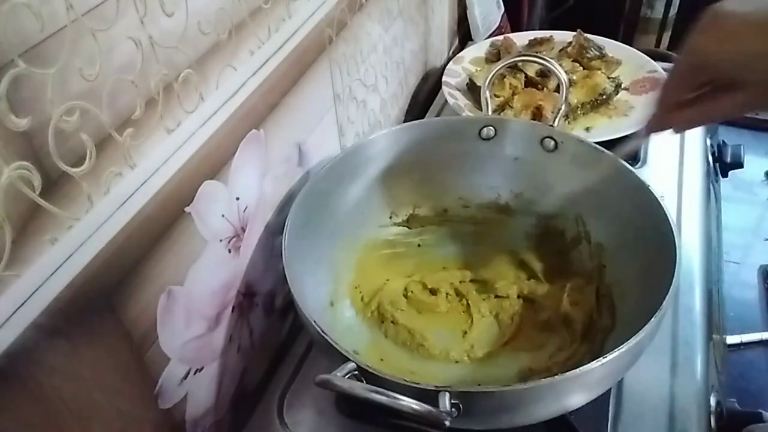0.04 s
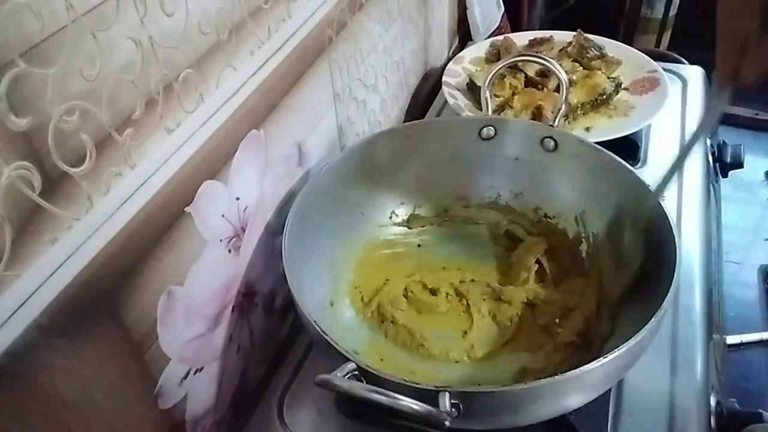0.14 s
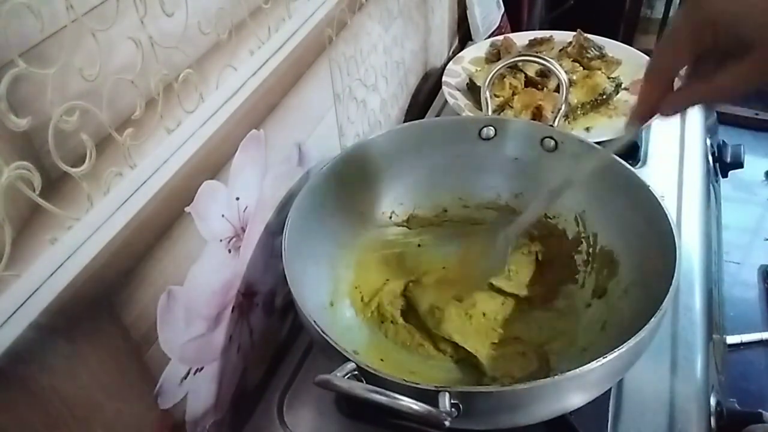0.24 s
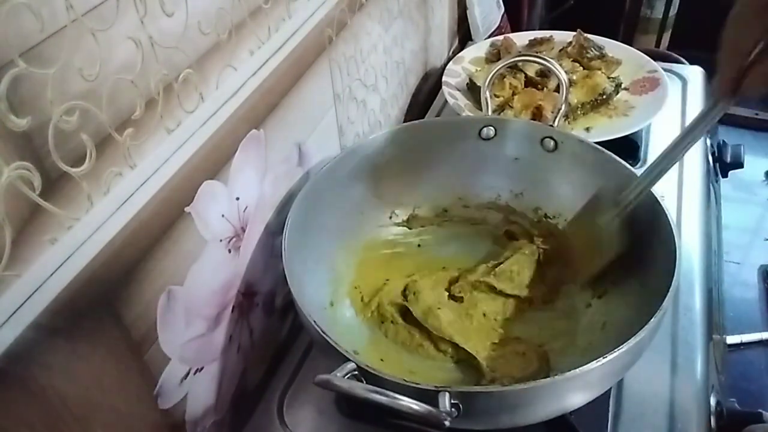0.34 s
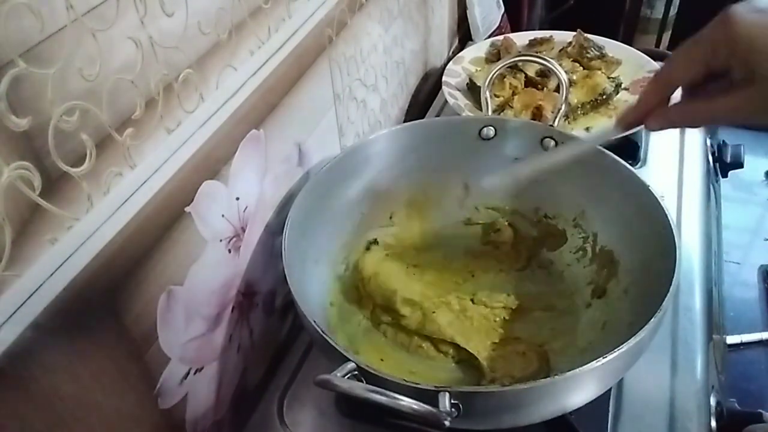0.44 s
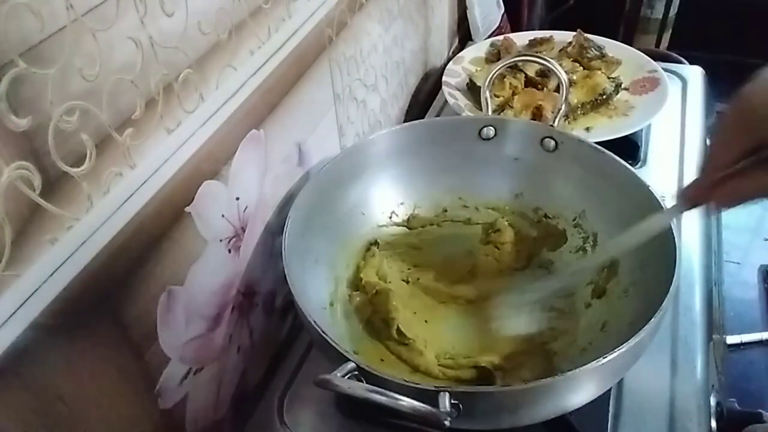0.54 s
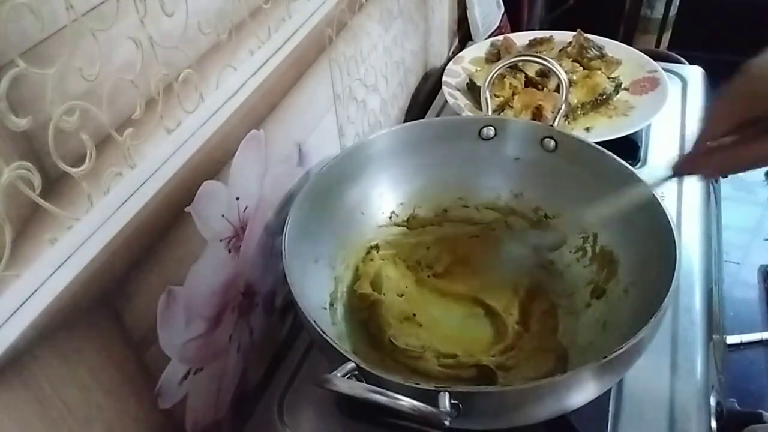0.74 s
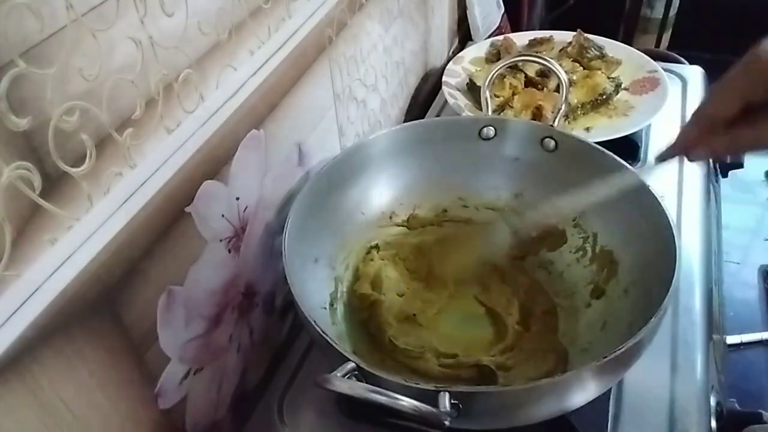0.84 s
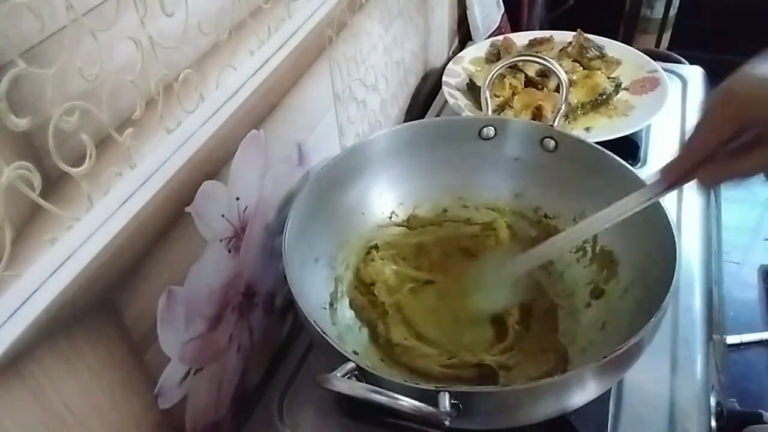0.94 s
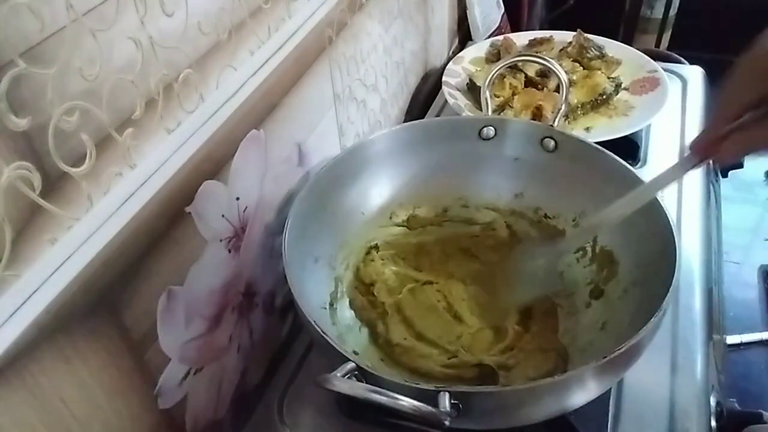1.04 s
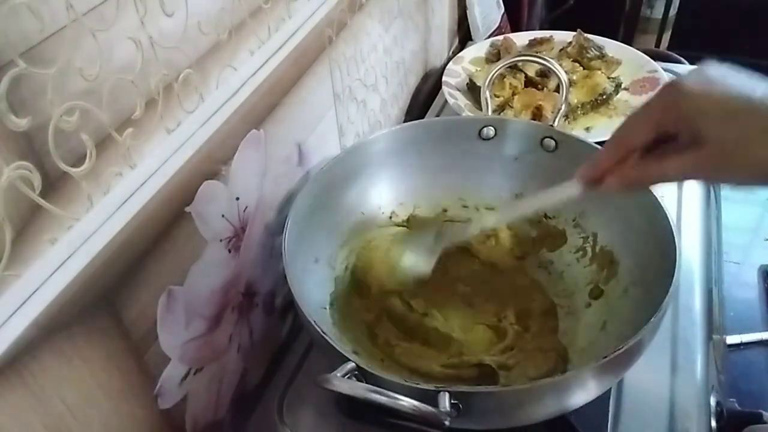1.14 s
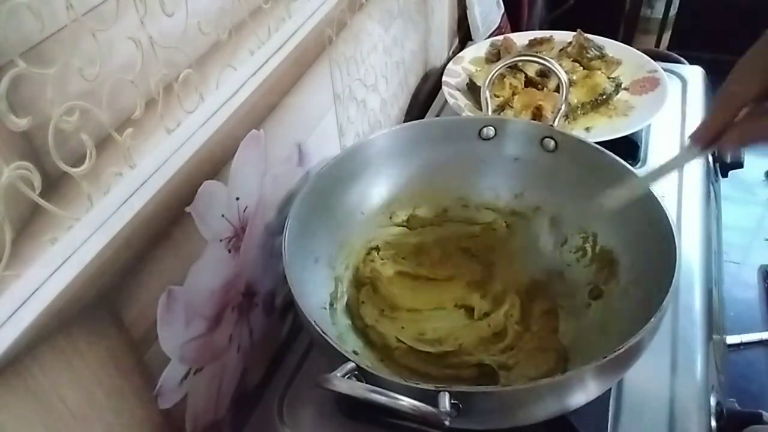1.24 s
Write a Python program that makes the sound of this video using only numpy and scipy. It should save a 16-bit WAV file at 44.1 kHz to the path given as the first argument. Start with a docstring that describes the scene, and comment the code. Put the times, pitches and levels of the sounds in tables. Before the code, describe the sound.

A spatula stirs thick paste in a metal pan, close by in a small kitchen. Light scrapes lead to a loud, juddering clank at 0.2 seconds that dies quickly. Short gritty scrapes follow from 0.3 to 0.8 seconds. Near 1.1 seconds comes a lighter knock, then a few soft plops until 1.3 seconds. A low stove rumble and faint sizzle continue throughout.

```python
"""A spatula stirs thick paste in a metal pan, close by, in a small kitchen.
From the start the stove rumbles and the paste sizzles faintly; light scrapes, a plop and a wisp of steam
follow. At 0.2 s the blade strikes the wall and judders, exciting modes that the paste quickly damps.
Stick-slip friction then drives blade and pan in short gritty strokes. Near 1.07 s the blade knocks
once more, steam whistles again and the paste folds over in a few last plops."""
import sys
import numpy as np
from scipy import signal
from scipy.fft import rfft, irfft
from scipy.io import wavfile

SR = 44100
rng = np.random.default_rng(int(sys.argv[2]) if len(sys.argv) > 2 else 0)


def master_out(mix):
    """Clip the mix to full scale and print it as 16-bit PCM to the path in sys.argv[1]."""
    frames = np.transpose(np.atleast_2d(mix))
    ceiling = np.clip(frames, -1, 1)
    pcm = np.round(ceiling * 32767).astype(np.int16)
    wavfile.write(sys.argv[1], SR, pcm)


N = 57330

# Spectral density of the stove's rumble: f/Hz, relative level/dB
STOVE_SPECTRUM = [(20, -1), (30, 0), (45, -13.5), (72, -10.5), (105, -2.5), (140, -6), (200, -9), (300, -9),
                  (500, -18), (800, -29.5), (1300, -33), (3000, -34.5), (7000, -42), (15000, -51)]
# Spectral density of the sizzle: f/Hz, relative level/dB
SIZZLE_SPECTRUM = [(500, -16), (1500, -5), (3000, -18), (7000, 2.5), (10000, -14), (15000, 12)]
# Strokes of the blade: t/s, duration/s, relative level/dB, tilt/(dB per octave), squelch level/dB
STROKES = [(0.0, 0.0064, -44.5, 5.5, -37), (0.013, 0.028, -50, 8, -50.5), (0.044, 0.03, -50, 1, -51.5),
           (0.156, 0.081, -47.5, 5, -57.5), (0.337, 0.012, -38.5, 4.5, -46.5),
           (.373, 0.01, -33.5, 6.5, -47.5), (0.385, 0.025, -34, -1.5, -47), (0.55, 0.073, -57, 1, -53),
           (0.616, 0.022, -41.5, 2, -61), (0.636, 0.023, -41.5, -4, -49), (0.668, 0.031, -55.5, -1, -68),
           (0.708, 0.042, -46.5, -.5, -53), (.761, 0.018, -39.5, -0.5, -69), (.784, 0.021, -40, -2, -57),
           (0.816, 0.012, -49.5, -4.5, -53.5), (0.966, 0.011, -58, -4, -62)]
# Response of the metal to grit under the blade: f/Hz, gain/dB
GRIT_RESPONSE = [(100, -7.5), (450, -24), (700, -15), (1100, -3), (1550, -6.5), (2200, 3.5), (3200, -2),
                 (4500, -3), (7000, -7), (10000, -15.5), (15000, -32)]
# Modes of the dragged blade: f/Hz, relative level/dB, T60/s, left minus right/dB
BLADE_MODES = [(1103, -7, 0.058, -20), (1916, -1, 0.057, -12.5), (2166, -13, 0.058, 12),
               (3067, -1, 0.029, 24), (3200, -4.5, 0.15, -15), (3324, -6.5, 0.1, 10),
               (3490, 1.5, 0.038, 14), (5300, -6, 0.016, 16), (6920, -4, 0.014, 11)]
# Paste slapped or folding over: t/s, level/dB, f/Hz, smack level/dB
PASTE_PLOPS = [(0.093, -51, 127, -61), (1.067, -32, 426, -62), (1.078, -32.5, 338, -54),
               (1.217, -55, 198, -56.5), (1.237, -32.5, 190, -57), (1.254, -37, 270, -52),
               (1.292, -36, 225, -51)]
# Steam escaping from the paste: t/s, duration/s, f/Hz, level/dB
STEAM_WHISTLES = [(0.132, 0.031, 3980, -59.5), (1.16, 0.027, 4140, -55.5)]
# Impacts of blade on pan: t/s, relative level/dB, judder duration/s, low-pass f/Hz, high-pass f/Hz,
# grit gain/dB, ring gain/dB
IMPACTS = [(.208, 9.5, 0.0012, 540, 276, -25, -27), (.211, 1, 0.012, 7500, 308, -2.5, -1.5),
           (0.243, -12, 0.0023, 755, 300, -20, -18), (0.343, -30, 0.0092, 9300, 900, 4.5, 2.5),
           (1.067, -15, 0.0018, 1200, 236, 5, -23), (1.0674, -31, 0.0065, 9000, 300, 12.5, -18),
           (1.075, -26.5, 0.0057, 9000, 244, 4.5, -4)]
# Spectral envelope of the pan's click and brief modes: f/Hz, gain/dB
CLANK_RESPONSE = [(120, -31), (230, -0.5), (330, -2), (480, -6.5), (690, 8.5), (1020, 1), (1350, 1.5),
                  (2000, 2), (2950, -0.5), (3500, 1.5), (4200, 4.5), (5600, 0.5), (7000, -7), (8500, -16),
                  (10200, -1), (12000, -32), (15000, -34)]
# Longer modes of the pan: f/Hz, relative level/dB, T60/s, left minus right/dB
PAN_MODES = [(308, 2, 0.16, 0.5), (350.3, 1.5, 0.14, -3.5), (593, -12.5, .12, -3), (677, -6, 0.069, -14),
             (866, -25, 0.06, -5), (1269, -7.5, 0.12, 5), (1300, -2.5, 0.036, -12), (2562, -4, 0.072, 14),
             (2550, -32.5, 0.22, 9), (2912, 0, 0.072, -24), (3150, -13.5, 0.21, 21.5),
             (3980, -5.5, 0.033, 23), (4840, -31, 0.047, 0), (5565, -2.5, 0.066, 20.5)]
# Response of the two microphone ports: f/Hz, left gain/dB, right gain/dB
PORT_RESPONSE = [(300, -2.5, -3.5), (838, 8.5, 3), (2060, 0, 3), (4300, -0.5, -5), (5780, -2, -1.5),
                 (6860, 10.5, -17.5), (7710, 2.5, 0.5), (9000, 0, -4.5), (10680, -19, 5.5),
                 (11470, -5, 2.5), (15500, -11, -16)]

WIDE_HZ = 900  # the channels of room and metal noise are unrelated above this


def undb(db):
    """Amplitude ratio of a level in decibels."""
    return 10 ** (np.asarray(db) / 20)


def unit(x):
    """Normalisation to an rms of one."""
    return x / np.sqrt(np.mean(x ** 2) + 1e-18)


def convolve(x, response):
    """A linear system's output is its input convolved with its impulse response."""
    return signal.fftconvolve(np.atleast_2d(x), np.atleast_2d(response), axes=-1)[:, :N]


def colour(x, points):
    """Minimum-phase filtering through (f/Hz, gain/dB) points: folding the cepstrum makes it causal."""
    size = 131072
    hz, db = np.array(points).T
    f = np.maximum(np.fft.rfftfreq(size, 1 / SR), 1)
    gain = undb(np.interp(np.log(f), np.log(hz), db))
    cepstrum = irfft(np.log(gain))
    cepstrum[1:size // 2] *= 2
    cepstrum[size // 2 + 1:] = 0
    return irfft(rfft(x, size) * np.exp(rfft(cepstrum)))[..., :N]


def cut(x, hz, kind, order=2):
    """Maximally flat low-pass or high-pass filtering."""
    return signal.sosfilt(signal.butter(order, min(hz, SR / 2 - 100), kind, fs=SR, output="sos"), x)


def diffuse(wide_hz):
    """A diffuse field at two points: coherent in the bass, incoherent above wide_hz."""
    mid, side = rng.standard_normal((2, N))
    side = cut(side, wide_hz, "high")
    return np.array([mid + side, mid - side]) / np.sqrt(2)


def grains(per_s=5900, spread_db=2.5):
    """Shot noise: independent tiny clicks, a few much larger than the rest."""
    size = undb(spread_db * np.minimum(rng.exponential(size=N), 5))
    return unit((rng.random(N) < per_s / SR) * size * rng.choice([-1, 1], N))


def stove(level_db=-44, side_db=-15.5):
    """Stationary noise weighted to the bass: a steady rumble with a little hiss."""
    antiphase = undb(side_db) * rng.standard_normal(N) * np.array([[1], [-1]])
    return undb(level_db) * unit(colour(diffuse(wide_hz=1100) + antiphase, STOVE_SPECTRUM))


def sizzle(level_db=-65):
    """Sparse, bright shot noise: the paste sizzles faintly throughout."""
    return undb(level_db) * unit(colour(grains(per_s=500, spread_db=2), SIZZLE_SPECTRUM))


def scrapes(attack_s=0.0013, swell_share=0.19, release_s=0.0071, force_db=8, blade_db=-40.5):
    """Stick-slip friction drives blade and pan, bright on the edge, dull on the flat; paste squelches."""
    t, force, push = np.arange(N) / SR, np.zeros(N), np.zeros(N)
    slip_spectrum = rfft(grains())
    octaves = np.log2(np.clip(np.fft.rfftfreq(N, 1 / SR), 400, 8000) / 3000)  # tilt pivots at 3 kHz
    for start, length, db, tilt_db, squelch_db in STROKES:
        swell = np.clip((t - start) / (attack_s + swell_share * length), 0, 1)
        pressure = swell * np.exp(-np.maximum(t - start - length, 0) / release_s)
        slips = irfft(slip_spectrum * undb(tilt_db * octaves), N)
        force += undb(db + force_db) * pressure * slips
        push += undb(squelch_db) * pressure
    squelch = unit(cut(cut(grains(), 308, "high"), 1130, "low"))
    metal = dense_modes(GRIT_RESPONSE, t60=0.025, dense_db=3.5) + undb(blade_db) * long_modes(BLADE_MODES)
    return convolve(force, metal) + push * squelch


def dense_modes(spectrum, t60, dense_db, click_db=-2, from_hz=1520):
    """Modal overlap: damped metal answers an impulse with a click and brief modes merging into noise."""
    t = np.arange(N) / SR
    decay = diffuse(WIDE_HZ) * undb(-60 * t / t60)
    dense = undb(dense_db) * unit(decay) / np.sqrt(N)
    click = undb(click_db) * (t == 0)
    return colour(cut(dense, from_hz, "high", order=1) + click, spectrum)


def long_modes(modes, build_s=0.0024):
    """Modal superposition: damped sinusoids build up as an impulse spreads through the metal."""
    t, response = np.arange(N) / SR, np.zeros((2, N))
    for hz, db, t60, balance_db in modes:
        gains = undb(db + np.array([[balance_db], [-balance_db]]) / 2)
        response += gains * np.cos(2 * np.pi * hz * t) * undb(-60 * t / t60)
    return response * (1 - np.exp(-t / build_s))


def plops(rise_s=0.0029):
    """Heavily damped oscillation: slapped or folding paste gives a few low cycles and a wet smack."""
    t, out = np.arange(N) / SR, np.zeros(N)
    smack = unit(cut(cut(grains(per_s=11000), 6170, "high"), 9000, "low"))
    for start, db, hz, smack_db in PASTE_PLOPS:
        age = np.maximum(t - start, 0)
        envelope = age / rise_s * np.exp(1 - age / rise_s)
        out += envelope * (undb(db) * np.sin(2 * np.pi * hz * age) + undb(smack_db) * smack)
    return out


def steam():
    """Flow-excited tones: steam leaves the paste in brief whistles of steady pitch."""
    t, out = np.arange(N) / SR, np.zeros(N)
    for start, length, hz, db in STEAM_WHISTLES:
        envelope = np.sin(np.pi * np.clip((t - start) / length, 0, 1))
        out += undb(db) * envelope * np.sin(2 * np.pi * hz * t)
    return out


def knocks(judder_hz=333.8, jitter=0.015, fade_db=0.5, force_db=12.5, pan_db=-25):
    """Impact excitation: a first blow rings the pan, then the blade catches, slips and grinds."""
    t, force, strike = np.arange(N) / SR, np.zeros(N), np.zeros(N)
    for start, db, length, lowpass_hz, highpass_hz, grit_db, ring_db in IMPACTS:
        gaps = (1 + jitter * rng.standard_normal(size=12)) / judder_hz
        delays = np.cumsum(gaps) - gaps[0]
        delays = delays[delays < length]
        blows, first_blow = np.zeros((2, N))
        blows[((start + delays) * SR).astype(int)] = undb(-fade_db * delays / length)
        first_blow[int(start * SR)] = undb(ring_db)
        touching = (t >= start) & (t < start + length)
        grit = grains() * touching * np.sqrt(judder_hz / SR)  # rms of a train of unit blows
        contact = np.array([blows + undb(grit_db) * grit, first_blow])
        contact = undb(db + force_db) * cut(cut(contact, lowpass_hz, "low"), highpass_hz, "high")
        force += contact[0]
        strike += contact[1]
    clank = convolve(force, dense_modes(CLANK_RESPONSE, t60=0.017, dense_db=0))
    return clank + undb(pan_db) * convolve(strike, long_modes(PAN_MODES))


def from_right(x, lag_s):
    """Path difference: sound from the right reaches the left port lag_s later."""
    phase_shift = np.exp(-2j * np.pi * np.fft.rfftfreq(2 * N, 1 / SR) * lag_s)
    left = irfft(rfft(x[0], 2 * N) * phase_shift)[:N]
    return np.array([left, x[1]])


def kitchen(x, t60=0.25, treble_t60=0.14, gain_db=-11, gap_s=0.0045):
    """Reverberation: diffuse reflections in a small hard room decay exponentially, the treble sooner."""
    t = np.arange(N) / SR
    reflections = diffuse(WIDE_HZ) * (t > gap_s)
    low = cut(reflections, 5200, "low", order=1)
    tail = low * undb(-60 * t / t60) + (reflections - low) * undb(-60 * t / treble_t60)
    return convolve(x, undb(gain_db) * unit(tail) / np.sqrt(N))


def scene():
    """Superposition of the direct sound from the pan, its reverberation and the stove."""
    metal = from_right(knocks(), lag_s=0.00014) + from_right(scrapes(), lag_s=0.00005)
    direct = metal + sizzle() + plops() + steam()
    return direct + kitchen(direct) + stove()


def record(dry, top_hz=15900):
    """Port resonances colour each channel; saturation rounds the peaks and a low-pass cuts the top."""
    ports = np.array(PORT_RESPONSE)
    heard = np.array([colour(dry[c], ports[:, [0, c + 1]]) for c in range(2)])
    rounded = heard / (1 + heard ** 6) ** (1 / 6)
    return signal.sosfilt(signal.ellip(8, .2, 70, top_hz, fs=SR, output="sos"), rounded)


dry = scene()
out = record(dry)
master_out(out)
```